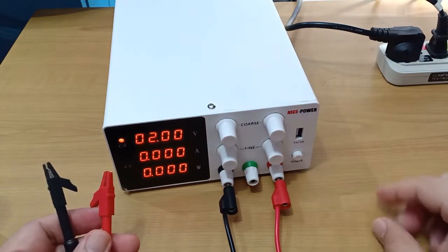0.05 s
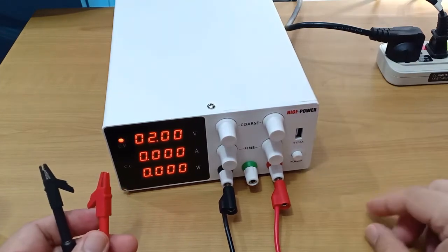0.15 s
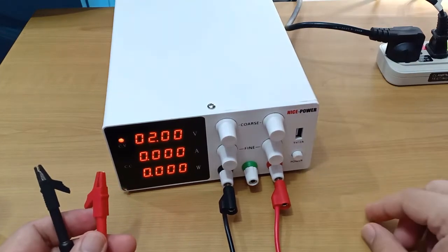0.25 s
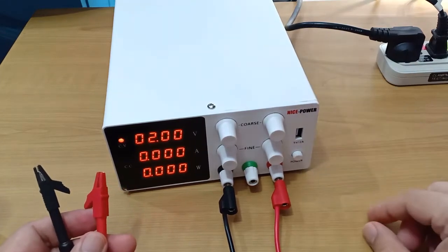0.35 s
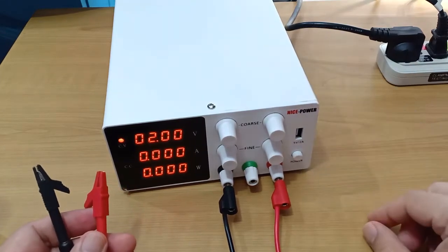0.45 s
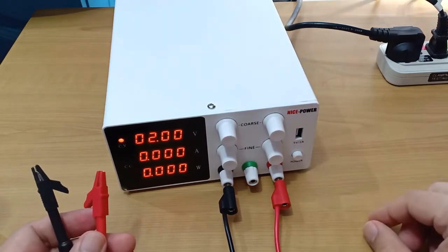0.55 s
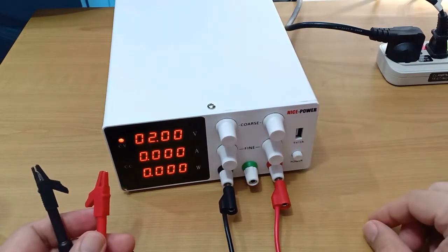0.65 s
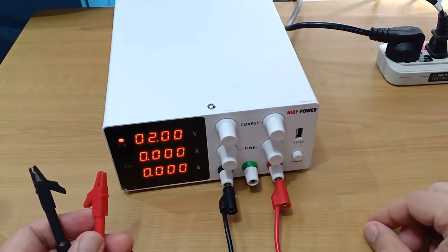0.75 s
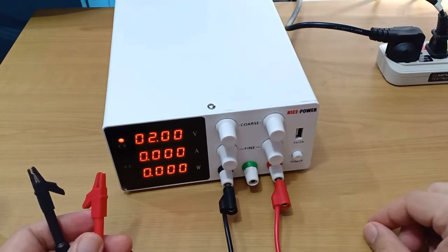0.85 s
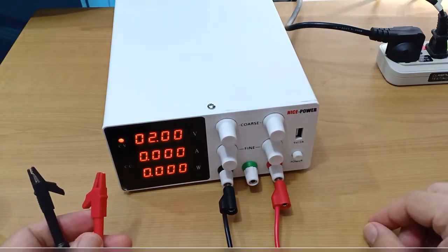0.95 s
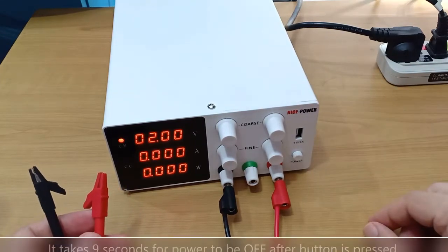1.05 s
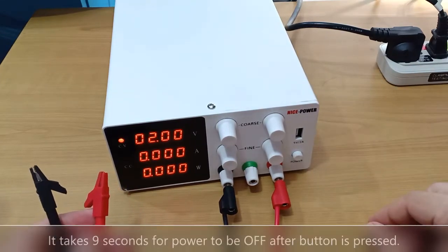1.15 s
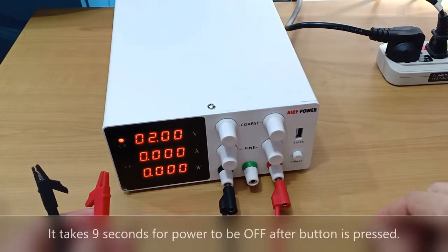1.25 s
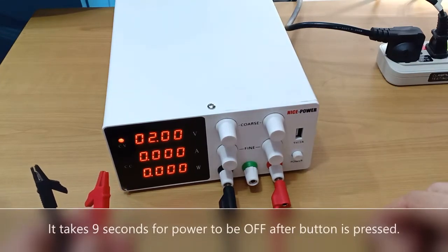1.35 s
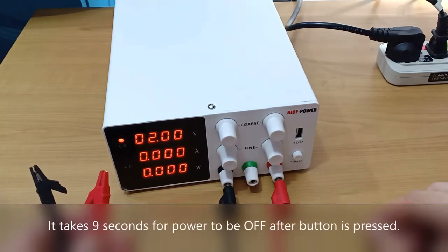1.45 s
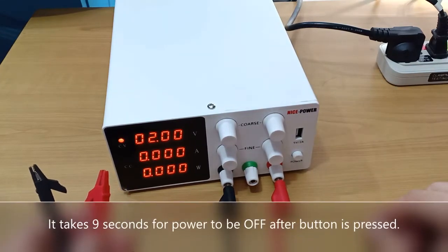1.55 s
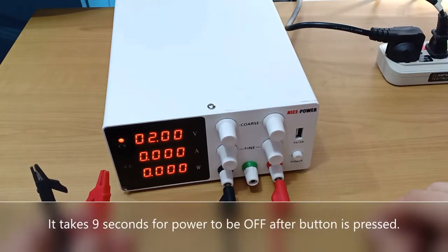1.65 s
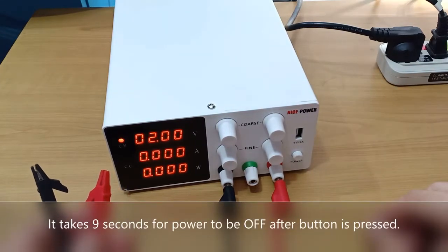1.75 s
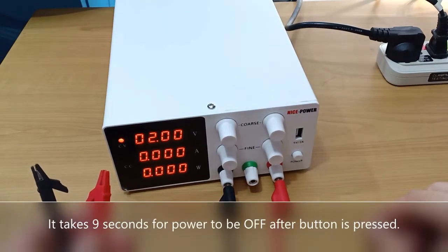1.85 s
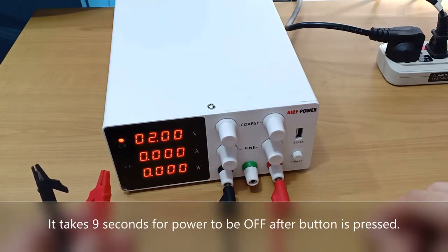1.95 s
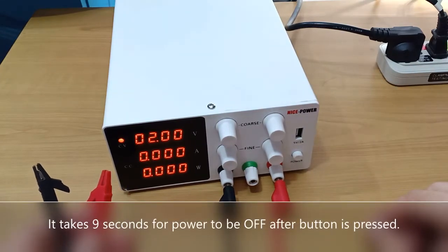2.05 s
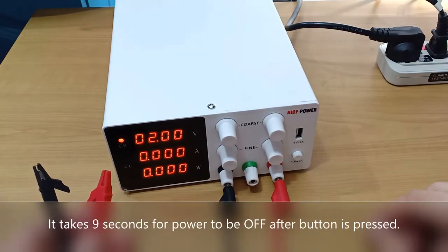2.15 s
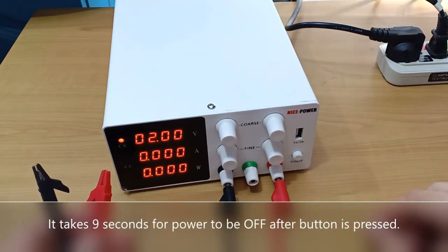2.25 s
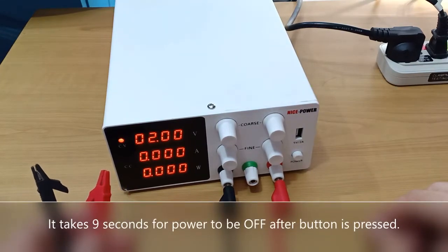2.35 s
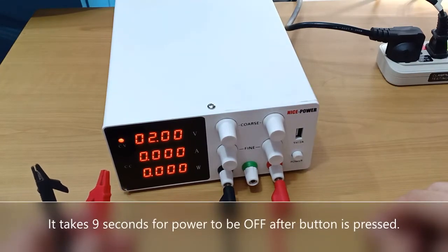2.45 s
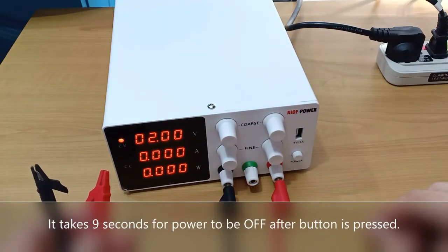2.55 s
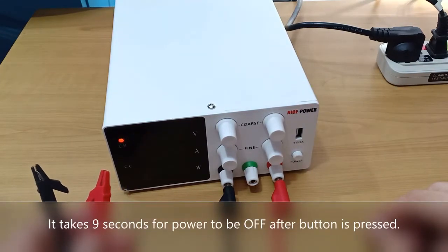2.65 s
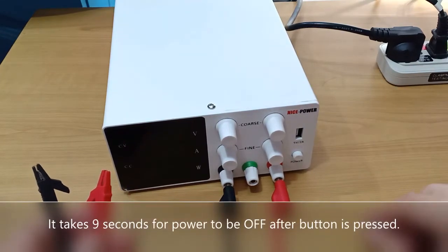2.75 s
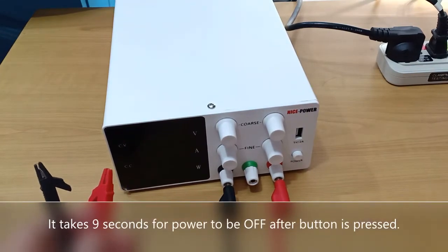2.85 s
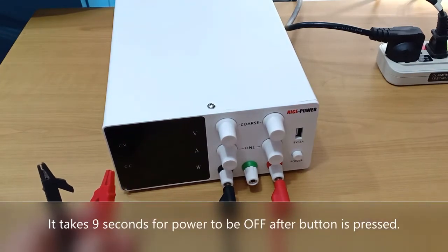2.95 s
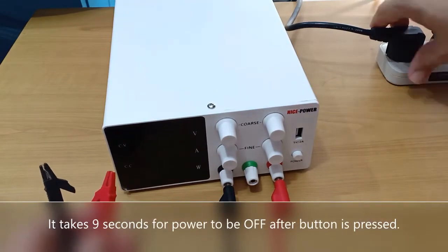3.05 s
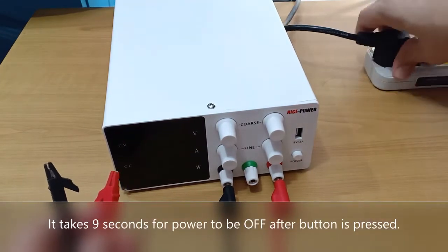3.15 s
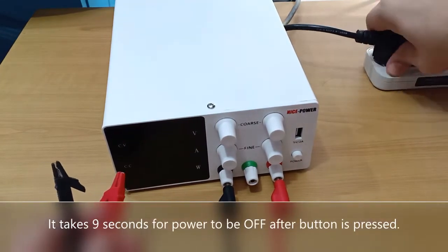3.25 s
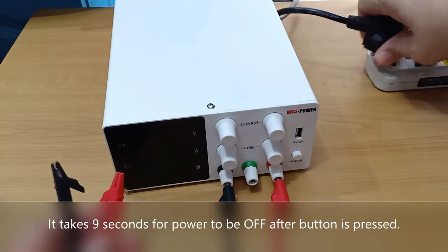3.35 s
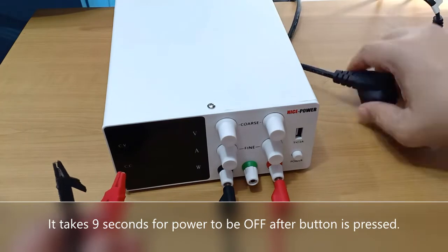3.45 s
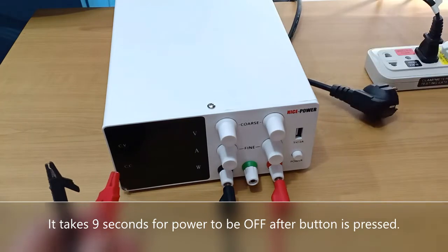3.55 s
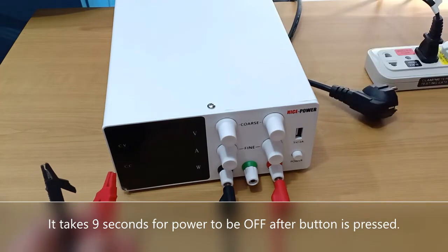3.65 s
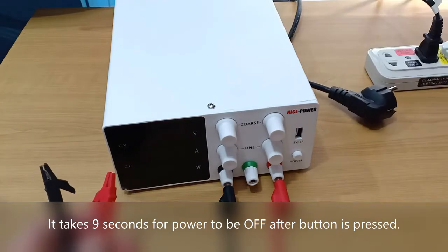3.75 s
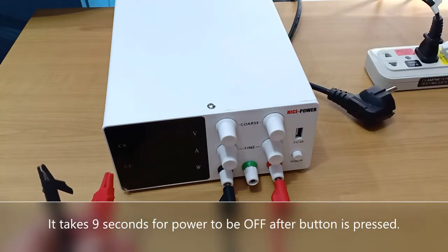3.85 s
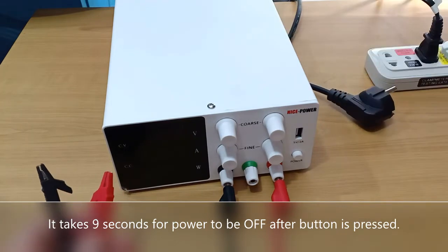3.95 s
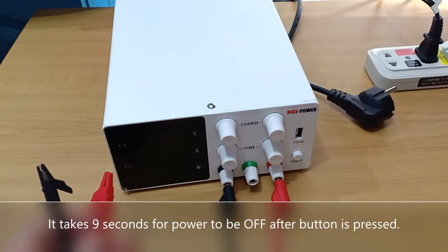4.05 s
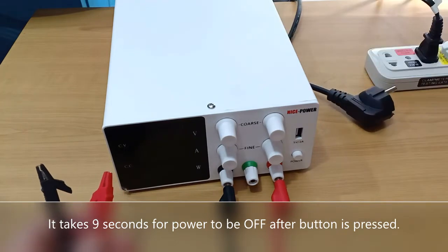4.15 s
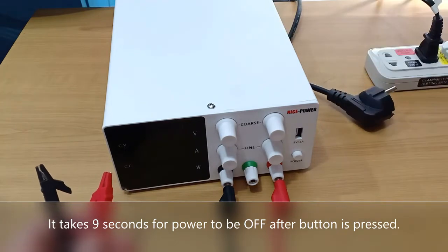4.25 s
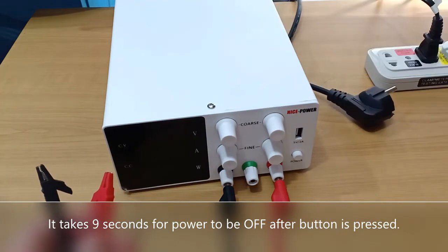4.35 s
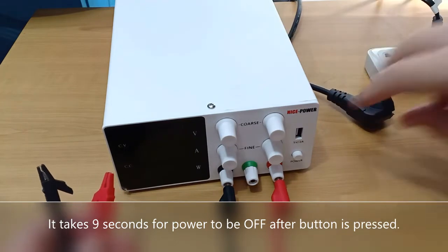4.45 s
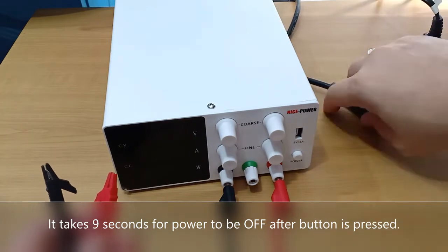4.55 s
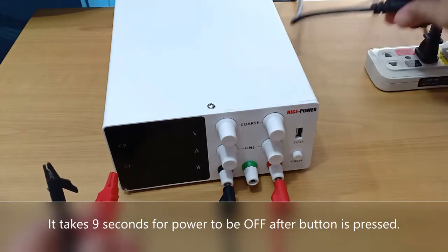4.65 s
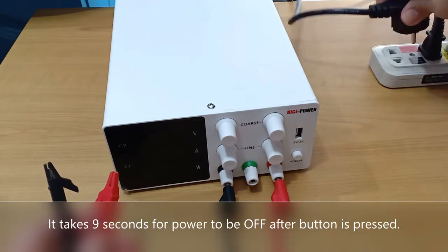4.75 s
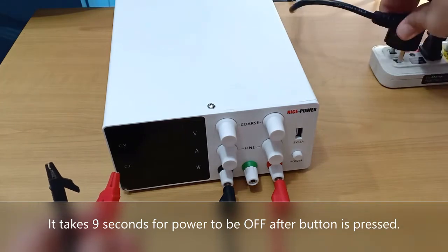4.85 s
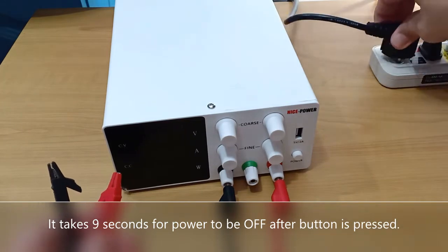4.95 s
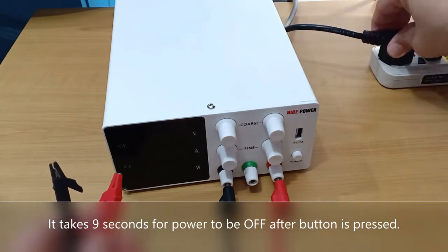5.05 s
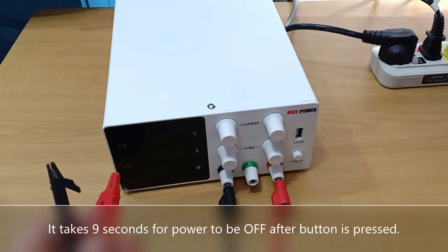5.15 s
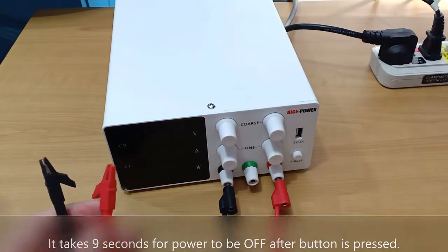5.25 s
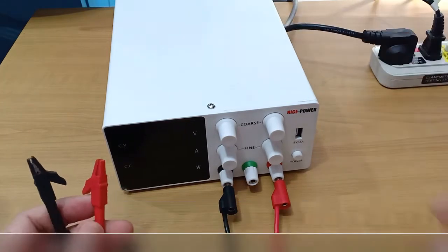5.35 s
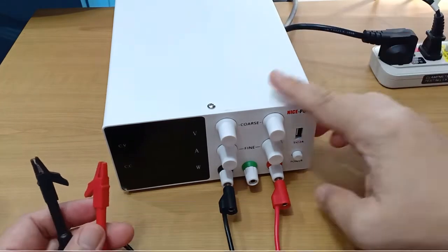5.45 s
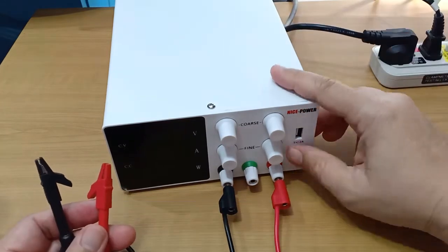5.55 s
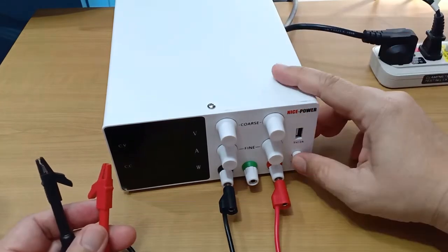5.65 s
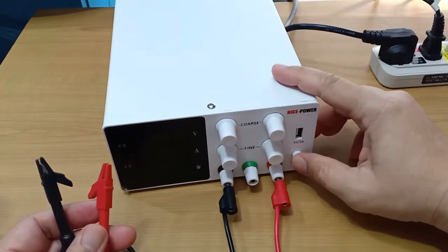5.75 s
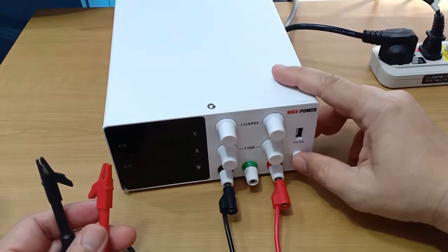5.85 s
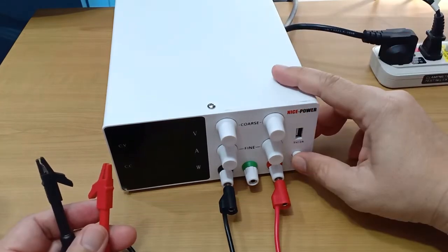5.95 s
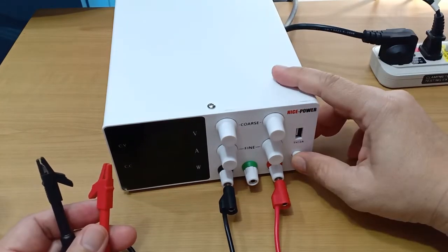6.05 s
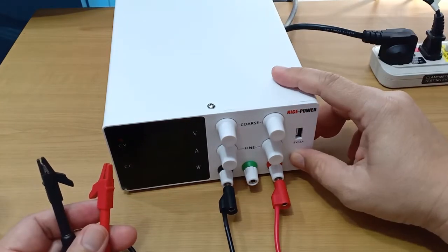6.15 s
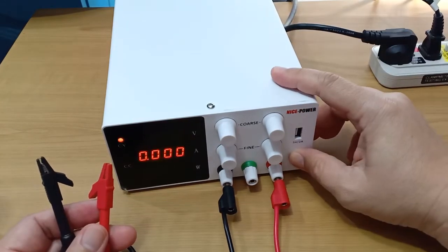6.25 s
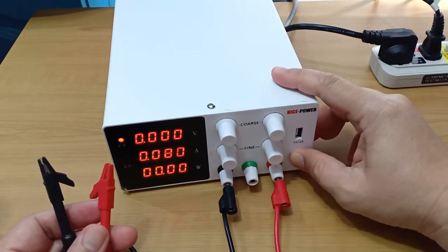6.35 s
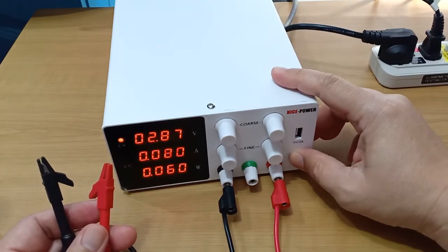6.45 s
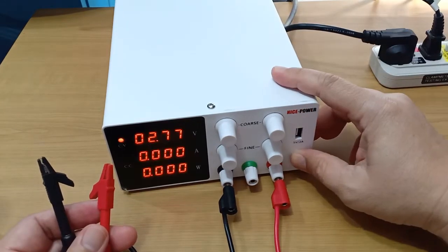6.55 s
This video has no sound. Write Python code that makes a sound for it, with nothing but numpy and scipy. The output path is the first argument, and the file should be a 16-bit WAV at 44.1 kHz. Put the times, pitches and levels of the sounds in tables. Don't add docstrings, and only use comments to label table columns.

```python
import sys
import numpy as np
from scipy import signal
from scipy.fft import rfft, irfft, next_fast_len
from scipy.io import wavfile
from scipy.ndimage import uniform_filter1d, map_coordinates

SR = 44100
rng = np.random.default_rng(int(sys.argv[2]) if len(sys.argv) > 2 else 0)


def amplitude_ratio(level_db):
    exponent = np.asarray(level_db, float) / 20
    return 10 ** exponent


def transcribe(signal):
    frames = np.atleast_2d(signal).T
    limited = np.clip(frames, -1, 1)
    pcm = np.round(limited * 32767).astype(np.int16)
    wavfile.write(sys.argv[1], SR, pcm)


N = 291187
SPEED = 4
# (t/s, t/s)
CUTS = (0.6496, 5.716)


def unit(x):
    return x / np.sqrt(np.mean(x ** 2) + 1e-20)


def along(points, hz):
    f, v = np.transpose(points)
    return np.interp(np.log(hz + 1), np.log(f + 1), v)


def curve(rows):
    return np.interp(np.arange(N) / SR, *np.transpose(rows))


def in_fast_part(t):
    return (t > CUTS[0]) & (t < CUTS[1])


def filtered(x, response):
    size = next_fast_len(x.shape[-1] + 8192)
    spectrum = rfft(x, size) * response(np.fft.rfftfreq(size, 1 / SR))
    return irfft(spectrum, size)[..., :x.shape[-1]]


def resonances(peaks):
    def response(f):
        total = 0
        for k, (centre, width, db) in enumerate(peaks):
            peak = 1j * f * width / (centre * centre - f * f + 1j * f * width)
            total = total + (-1) ** k * amplitude_ratio(db) * peak
        return total
    return response


def power(peaks, hz):
    p = 0
    for centre, width, db in peaks:
        p = p + amplitude_ratio(2 * db) * (hz * width) ** 2 / ((centre * centre - hz * hz) ** 2 + (hz * width) ** 2)
    return p / np.mean(np.sqrt(p)) ** 2


def pulse(p):
    cepstrum = irfft(np.log(p + 1e-9) / 2)
    half = len(cepstrum) // 2
    cepstrum[1:half] *= 2
    cepstrum[half + 1:] = 0
    return irfft(np.exp(rfft(cepstrum)))


def air(spectrum, alike, patchy_db, lumpy_db):
    hz, _, z = signal.stft(rng.standard_normal((2, N)), SR, nperseg=1024)
    patches = uniform_filter1d(rng.standard_normal(z.shape[1:]), size=3, axis=0)
    patches = uniform_filter1d(patches, size=6, axis=1)
    depth_db = patchy_db + lumpy_db / (1 + (hz[:, None] / 300) ** 2)
    pair = signal.istft(z * amplitude_ratio(depth_db * unit(patches)), nperseg=1024)[1][:, :N]

    def colour(hz):
        turn = np.arccos(np.clip(along(alike, hz), -1, 1)) / 2
        return amplitude_ratio(along(spectrum, hz)) * [np.cos(turn), np.sin(turn)]
    mid, side = filtered(pair, colour)
    return unit(np.array([mid + side, mid - side]))


# (f/Hz, level/dB)
MOTOR_TONES = [(134.4, -88), (239.6, -76.5), (273.3, -75.5), (312.2, -75), (819.5, -84.5), (1054, -82.5),
               (1366, -88.5), (1561, -88.5), (1833, -99), (1873.4, -77), (1951.5, -101.5)]
# (t/s, level/dB)
MOTOR_LOAD = [(0, 4), (3, 2), (3.9, 2.5), (4.7, 2), (5.6, 1), (6, 1.5), (6.6, 1.5)]


def motor(speed, gain_db, drift):
    t = np.arange(N) / SR
    tones = 0
    for hz, db in MOTOR_TONES:
        wander = drift * np.cumsum(rng.standard_normal(N)) / np.sqrt(SR)
        tones = tones + amplitude_ratio(db) * np.sin(2 * np.pi * hz * speed * t + wander)
    return amplitude_ratio(curve(MOTOR_LOAD) + gain_db) * tones


# (f/Hz, level per Hz/dB)
AIR_SLOW = [(12, -38), (20, -7), (32, -12.5), (124, -12.5), (349, -6.5), (683, -12.5), (808, -11),
            (956, -14), (1070, -13.5), (1720, -13.5), (1870, -12.5), (2550, -15), (3470, -26.5),
            (14100, -46), (16200, -38)]
# (f/Hz, likeness)
ALIKE_SLOW = [(60, 0.11), (240, 0.83), (950, 0.0028), (3770, -0.025), (15000, -0.26)]
# (t/s, level/dB)
LEVEL_SLOW = [(0, -57), (.44, -58.5), (5.77, -58), (6.27, -58), (6.6, -58.5)]
# (f/Hz, level per Hz/dB)
HISS = [(2350, -29), (4000, -22), (4140, 8), (7460, -5.5), (11900, 0.5), (14000, 0.5), (16300, -19.5)]


def slow_room():
    room = amplitude_ratio(curve(LEVEL_SLOW) + 0.5) * air(AIR_SLOW, ALIKE_SLOW, patchy_db=2.2, lumpy_db=0.5)
    hiss = amplitude_ratio(-79.5) * air(HISS, [(4000, .05)], patchy_db=2.5, lumpy_db=0)
    return room + motor(1, gain_db=4.0, drift=1.6) + hiss


# (f/Hz, level per Hz/dB)
AIR_FAST = [(12, -42.5), (20, -11.5), (33, -14), (110, -24), (160, -24), (312, -12), (390, -17.5),
            (436, -13.5), (546, -10.5), (743, -12.5), (1100, -7), (2620, -13), (3190, -14), (9250, -15),
            (16200, -29.5)]
# (f/Hz, likeness)
ALIKE_FAST = [(60, 0.57), (180, 0.41), (550, 0.48), (1650, 0.61), (4970, 0.034), (15000, 0.12)]
# (t/s, reach/s, added level/dB)
STIRS = [
    (3.41, 0.16, 5),
    (4.78, 0.11, 3),
]


def fast_room():
    t = np.arange(N) / SR
    stir_db = sum(db * np.exp(-np.abs(t - s) / reach) for s, reach, db in STIRS)
    room = amplitude_ratio(stir_db - 59.5) * air(AIR_FAST, ALIKE_FAST, patchy_db=1.74, lumpy_db=1.5)
    return room + motor(SPEED, gain_db=1.5, drift=3.08)


# (t/s, firing f/Hz, level/dB)
ENGINE = [
    (1.4, 80.8, -86),
    (1.75, 80.4, -77),
    (2.05, 79.3, -75.5),
    (2.2, 76.2, -73.5),
    (2.3, 73, -85),
    (2.45, 69.7, -82),
    (2.7, 69.1, -84),
]
ENGINE_ORDERS_DB = [0.5, 2, 0.5, 1, -3, -8, -9.5, -0.5]


def traffic():
    s, hz, db = np.transpose(ENGINE)
    turns = np.cumsum(curve(np.transpose([s, hz]))) / SR
    knots = rng.standard_normal((len(ENGINE_ORDERS_DB), 60))
    tones = 0
    for k, level in enumerate(ENGINE_ORDERS_DB):
        wobble = map_coordinates(knots[k], [np.linspace(0, 59, N)], order=1)
        tones = tones + amplitude_ratio(level + 4.5 * wobble) * np.sin(2 * np.pi * (k + 4) * turns)
    return amplitude_ratio(curve(np.transpose([s, db]))) * tones


# (f/Hz, t/s)
ROOM = [(100, 0.28), (600, 0.2), (2000, 0.11), (6000, 0.13), (16000, 0.11), (60000, .14)]


def echoes(speed, apart):
    hz, t, z = signal.stft(rng.standard_normal((2, int(SR / 2 / speed))), SR, nperseg=64)
    z[1] *= apart * np.clip(hz[:, None] / 4000, .3, 1)
    decay = amplitude_ratio(-60 * t * speed / along(ROOM, hz / speed)[:, None])
    mid, side = signal.istft(z * decay, SR, nperseg=64)[1]
    build = 1 - np.exp(-(np.arange(len(mid)) / SR * speed / 0.0022) ** 2)
    return np.array([mid + side, mid - side]) * build / np.linalg.norm(mid)


# (f/Hz, level/dB, time to fall by 60 dB t/s)
CASE = [(980, -18, 0.62), (1585, -15.5, 0.221), (1860, -12, 0.16), (2680, -14, 0.13), (3150, -2.5, 0.053),
        (3130, -17, 0.175), (4620, -17, .14), (5140, -9, 0.071), (5240, -12, 0.14)]


def case_ring(t):
    modes = sum(amplitude_ratio(level - 60 * t / t60) * np.sin(2 * np.pi * hz * t) for hz, level, t60 in CASE)
    return modes * (1 - np.exp(-t / 0.0048))


def right_port(f):
    return np.exp(-2j * np.pi * f * .000028) * (1 + (f / 16000) ** 2)


def contacts(events, speed, snap, desk, width_hz, rattle_s, near, wet_db, ring_db, pan_db, overtone=1.7):
    out = np.zeros((2, N + SR))
    t = np.arange(int(SR / 2 / speed)) / SR
    f = np.fft.rfftfreq(4096, 1 / SR)
    ring = case_ring(t)
    for s, db, hz, snap_db, thud_db in events:
        force = 0.25 * rng.standard_normal(400) * amplitude_ratio(-60 * t[:400] / rattle_s)
        force[round(.0007 * SR)] += 1
        knock = power([(hz, width_hz, 0), (hz * overtone, width_hz * 0.5, -8)], f)
        knock *= f ** 4 / (f ** 4 + (.55 * hz) ** 4) / (1 + (f / (2.4 * hz)) ** 4)
        struck = []
        for (centre, width, level), (u, v) in zip(snap, rng.standard_normal((len(snap), 2))):
            struck.append((centre * np.exp(0.064 * u), width, level + 4.1 * v))
        crack = power(struck, f) ** 1.303 * f ** 4 / (f ** 4 + 2500 ** 4)
        thud = power(desk, f) * f ** 2 / (f ** 2 + 230 ** 2)
        colour = knock + amplitude_ratio(2 * snap_db + 22.5) * crack + amplitude_ratio(2 * thud_db + 26.5) * thud
        close = colour + near * (knock + .3 * amplitude_ratio(2 * snap_db + 25.5) * crack)
        even = np.abs(rfft(force, 4096)) ** 2 + .05
        direct = np.convolve(force, pulse(close / even))
        spread = np.convolve(force, pulse(colour ** 1.082 * np.mean(colour) ** 0.29 / even))
        wet = signal.fftconvolve(spread[None], echoes(speed, apart=1.0), axes=1)[:, :len(t)]
        left, right = np.pad(direct, (0, len(t) - len(direct))) + amplitude_ratio(wet_db) * wet
        sound = np.array([left, filtered(right, right_port)]) + amplitude_ratio(ring_db) * ring
        pan = np.array([[pan_db], [-pan_db]]) / 2
        out[:, round(s * SR):][:, :len(t)] += amplitude_ratio(db + 3.5 + pan) * sound
    return out[:, :N]


# (f/Hz, width/Hz, level/dB)
SNAP_TICK = [(5600, 1500, -2.5), (9420, 2500, 0), (12000, 1500, -13)]
# (f/Hz, width/Hz, level/dB)
THUD_FAST = [(308, 160, -2.5), (730, 990, 3)]


def clock():
    s = np.arange(.6995, CUTS[1], 1 / SPEED)
    chance = rng.standard_normal((len(s), 2))
    level_db = -52 - 1.7 * (s - s[0]) + 2.2 * chance[:, 0]
    hz = 1090 * np.exp(0.074 * chance[:, 1])
    ticks = [(*row, -5.5, -33) for row in zip(s, level_db, hz)]
    return contacts(ticks, SPEED, SNAP_TICK, THUD_FAST, width_hz=130, rattle_s=0.0072, near=1.1,
                    wet_db=5, ring_db=-94, pan_db=-1.1)


def swell(s, length, shape):
    return np.sin(np.pi * np.clip((np.arange(N) / SR - s) / length, 0, 1)) ** shape


# (t/s, length/s, level/dB, body f/Hz, treble share)
SCUFFS = [(2.827, 0.097, -55.5, 1550, 0.54), (3.178, 0.025, -46.5, 1500, 0.61),
          (3.267, 0.046, -53.5, 1750, 0.24), (3.465, 0.14, -47, 1740, 0.44), (4.553, 0.14, -57.5, 375, .1),
          (4.564, 0.066, -57, 2030, 0.2), (4.711, 0.039, -48, 1630, 0.49), (3.359, 0.032, -41, 2000, 0.55),
          (5.1, 0.13, -59, 1500, .5), (5.504, 0.059, -60, 10440, 0.064), (5.594, 0.035, -59, 3780, 0.33),
          (5.62, 0.029, -64.5, 11000, 0.11), (0.085, 0.033, -64.5, 5200, 0.05),
          (0.02, 0.07, -61, 2800, .05), (5.742, 0.068, -57, 288, 0.046), (6.164, 0.048, -64, 2800, 0.035),
          (6.346, 0.065, -70, 2500, 0.054)]
# (f/Hz, width/Hz, level/dB)
SNAP_FAST = [(3960, 550, 0), (6010, 1440, -1.5), (8620, 1840, 0.5), (11000, 630, 0), (15000, 990, -24)]


def scuffs():
    density = uniform_filter1d(rng.exponential(1, N) ** 2, size=60)
    grains = rng.standard_normal((2, N)) * density
    shell = unit(filtered(grains, resonances(SNAP_FAST)))
    out = np.zeros((2, N))
    for s, length, db, hz, share in SCUFFS:
        span = slice(round(s * SR), round((s + length) * SR))
        response = resonances([(hz, .45 * hz, 0)])
        body = unit(filtered(grains[:, span], lambda f: response(f) ** 2))
        rub = (1 - share) * body + share * shell[:, span]
        out[:, span] += amplitude_ratio(db) * swell(s, length, shape=0.6)[span] * rub
    return out


# (t/s, knock level/dB, knock f/Hz, snap level over knock/dB, thud level over knock/dB)
PLUG = [(2.8201, -43.5, 1995, -5, -9), (2.9706, -36.5, 2036, -24.5, -40), (3.0752, -46, 980, -8, -5.5),
        (3.1422, -42, 1500, -16.5, -18), (3.2578, -55.5, 1850, 4, -16), (3.273, -46, 1750, -7.5, -27.5),
        (3.302, -41, 1790, -7, -30.5), (3.3183, -63, 1530, 7, -22), (3.3516, -21, 1315, -4.5, -22.5),
        (3.3702, -23.5, 1900, -5, -31), (3.4038, -29, 2180, -8.5, -42), (3.4058, -23.5, 2100, -9, -40),
        (3.487, -23, 1580, -15, -33), (3.4966, -31.5, 2190, -2.5, -27.5), (3.573, -28.5, 1220, -31, -40),
        (3.5793, -31.5, 1930, -16, -26)]
PUSH = [
    (4.5747, -33, 1930, -16, -16.5),
    (4.657, -38, 536, -30.5, -18),
    (4.7154, -47, 970, -13, -24),
    (4.8687, -24, 2170, -1, -24),
    (4.931, -50.5, 1880, -2, -25.5),
    (4.9475, -56, 1286, 2.5, -24.5),
    (5.0438, -14, 1680, -5, -20),
    (5.0755, -43, 1890, -4.5, -10.5),
    (5.1665, -48.5, 1010, -6.5, -37),
]
# (f/Hz, width/Hz, level/dB)
SNAP_PUSH = [(4300, 2600, -2), (5870, 810, -1), (7660, 1500, -3), (9800, 1900, 6), (14800, 2500, -28.5)]


def plug():
    dropped = contacts(PLUG, SPEED, SNAP_FAST, THUD_FAST, width_hz=420, rattle_s=0.0063, near=1.2,
                       wet_db=-1.5, ring_db=-90, pan_db=-1.5)
    pushed = contacts(PUSH, SPEED, SNAP_PUSH, THUD_FAST, width_hz=460, rattle_s=.003, near=1.6,
                      wet_db=-2.5, ring_db=-90.5, pan_db=-0.6)
    return dropped + pushed


# (t/s, knock level/dB, knock f/Hz, snap level over knock/dB, thud level over knock/dB)
BUTTON = [
    (6.2069, -13.5, 2780, -9.5, -12.5),
]
TOUCH = [
    (0.0305, -52, 2610, -24, -30),
    (5.756, -44, 2344, -29, -28),
    (6.57, -34.5, 2780, -9, -14),
]
CREAK = [
    (6.1255, -46.5, 2800, -21.5, -35),
    (6.168, -46, 2860, -23.5, -39),
]
# (f/Hz, width/Hz, level/dB)
SNAP_BUTTON = [(3900, 1830, 2), (5200, 990, 6), (6260, 1200, 2.5), (8020, 1300, -30), (13400, 2500, -13)]
# (f/Hz, width/Hz, level/dB)
SNAP_RELAY = [(4700, 1300, -11.5), (5840, 710, 9), (8700, 1200, -23), (13550, 3000, -4.5)]
# (f/Hz, width/Hz, level/dB)
THUD_SLOW = [(455, 72, -2.5), (830, 460, -2), (1750, 560, 3.5)]


def button():
    press = contacts(BUTTON, 0.85, SNAP_BUTTON, THUD_SLOW, width_hz=240, rattle_s=0.0035, near=3.9,
                     wet_db=-3.5, ring_db=-16.5, pan_db=-3.5)
    touch = contacts(TOUCH, 0.91, SNAP_RELAY, THUD_SLOW, width_hz=280, rattle_s=0.0064, near=2.9,
                     wet_db=1.0, ring_db=-39, pan_db=-1.5)
    creak = contacts(CREAK, 0.9, SNAP_RELAY, THUD_SLOW, width_hz=72, rattle_s=0.012, near=1.7,
                     wet_db=-2.5, ring_db=-95, pan_db=-0.5, overtone=2.16)
    return press + touch + creak


def scene():
    fast = in_fast_part(np.arange(N) / SR)
    rooms = np.where(fast, fast_room() + traffic(), slow_room()) * amplitude_ratio([[-.6], [.6]])
    return rooms + clock() + scuffs() + plug() + button()


# (end t/s, length/s, level/dB)
DIPS = [
    (3.346, 0.0068, -33),
    (5.033, .003, -7),
    (6.2074, 0.0077, -12),
]


def dips():
    t = np.arange(N) / SR
    dip_db = sum(db * ((t > end - length) & (t < end)) for end, length, db in DIPS)
    return amplitude_ratio(uniform_filter1d(dip_db, size=66))


def low_pass(x):
    return signal.sosfilt(signal.butter(12, 17000, fs=SR, output="sos"), x)


def record(dry):
    t = np.arange(N) / SR
    fade_s, gain_slow, gain_fast = 0.031, 0.8, 1
    fade = np.prod([np.clip(np.abs(t - s) / fade_s, 0, 1) ** 2.1 for s in CUTS], axis=0)
    fade *= np.where(in_fast_part(t), gain_fast, gain_slow)
    heard = filtered(dry, lambda hz: hz < 15800)
    offset = [[.00106], [.00112]]
    mix = (heard * dips() + offset) * fade
    return low_pass(mix)


dry = scene()
out = record(dry)
transcribe(out)
```